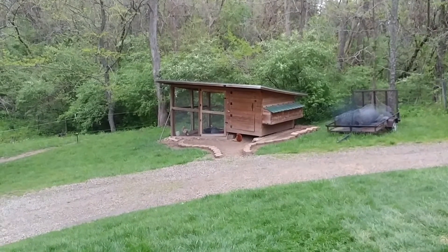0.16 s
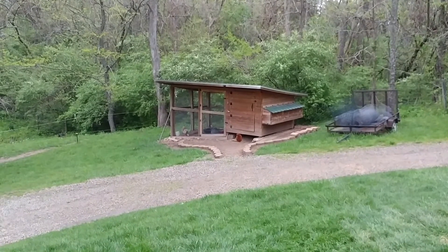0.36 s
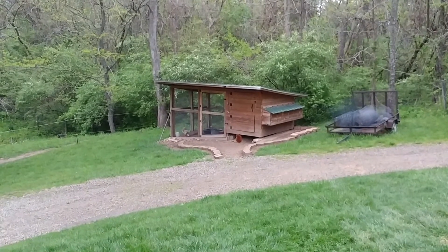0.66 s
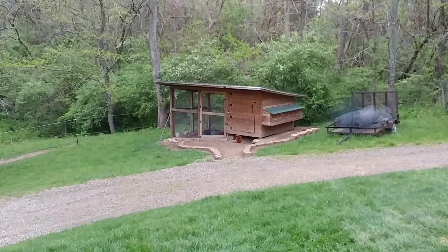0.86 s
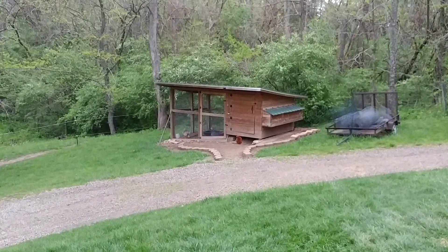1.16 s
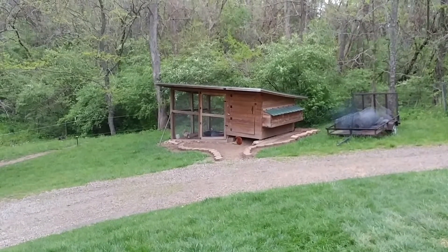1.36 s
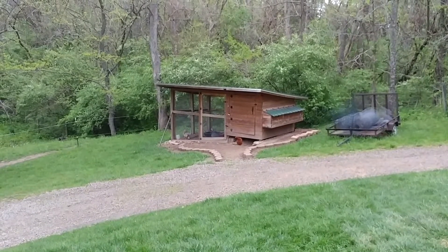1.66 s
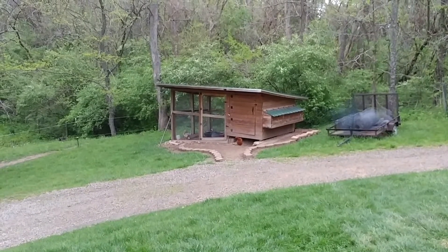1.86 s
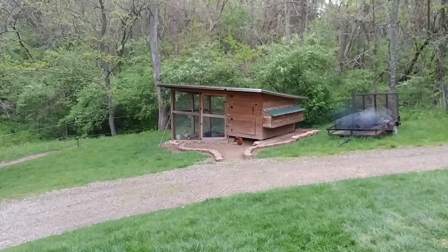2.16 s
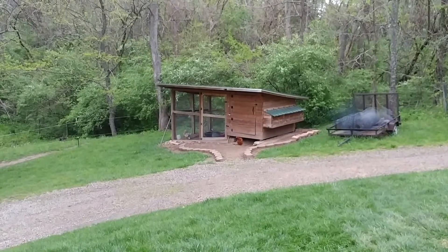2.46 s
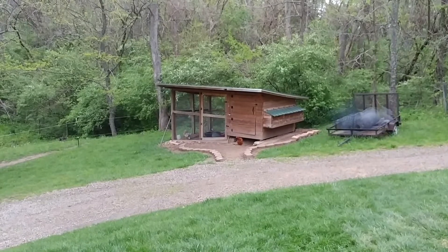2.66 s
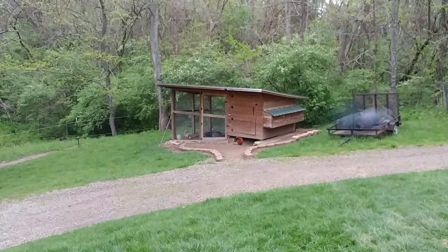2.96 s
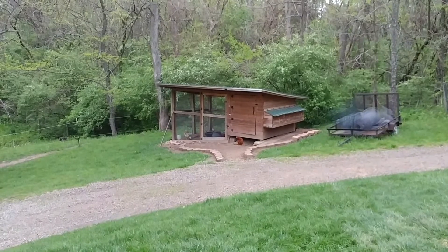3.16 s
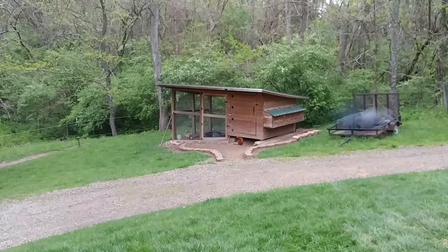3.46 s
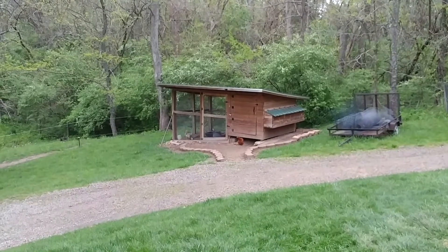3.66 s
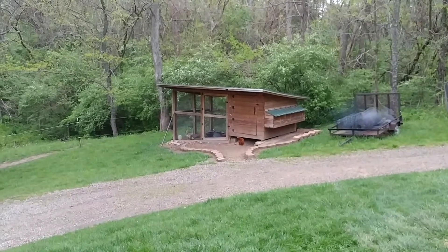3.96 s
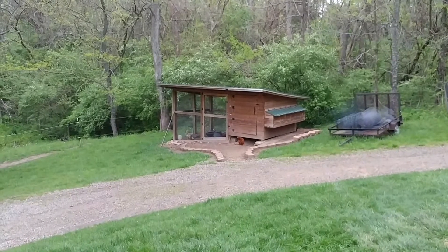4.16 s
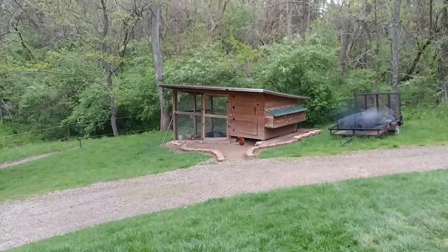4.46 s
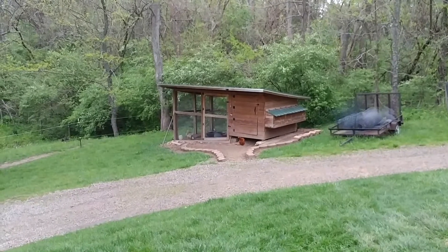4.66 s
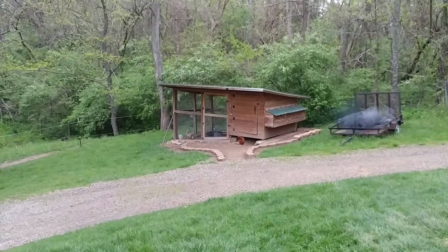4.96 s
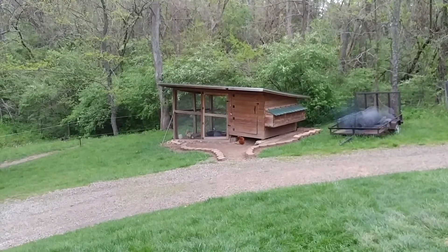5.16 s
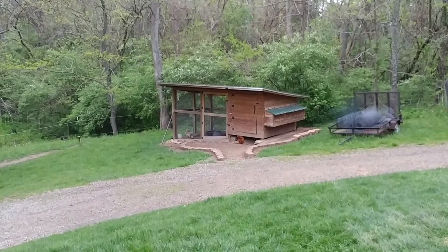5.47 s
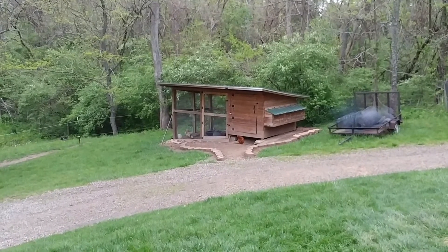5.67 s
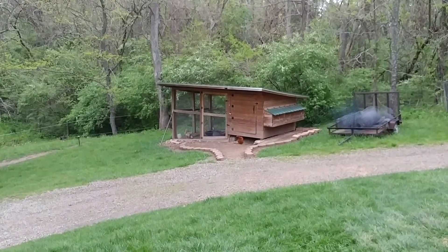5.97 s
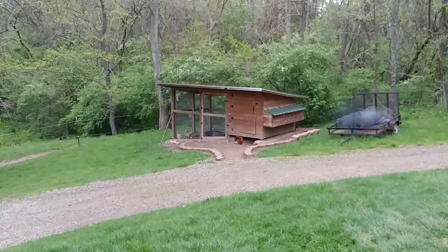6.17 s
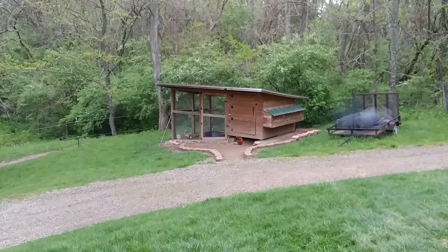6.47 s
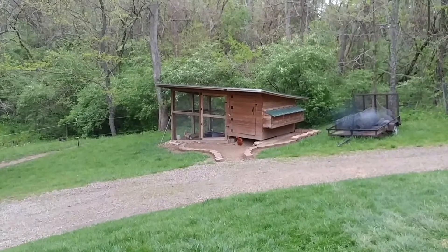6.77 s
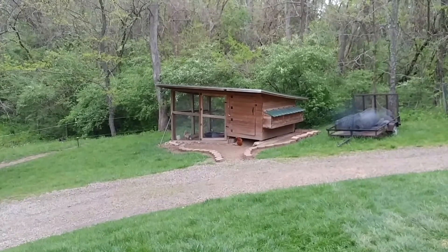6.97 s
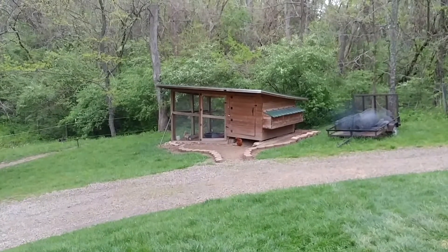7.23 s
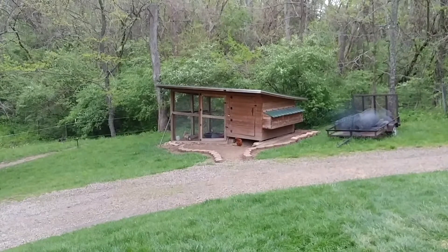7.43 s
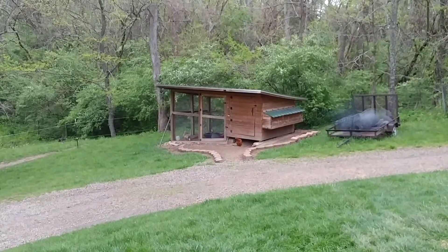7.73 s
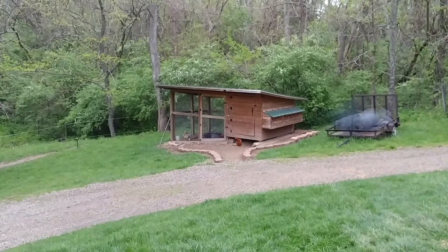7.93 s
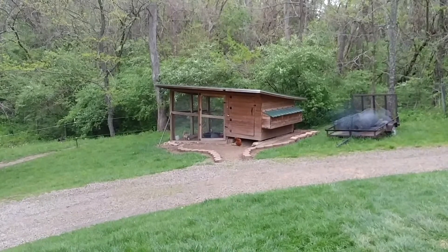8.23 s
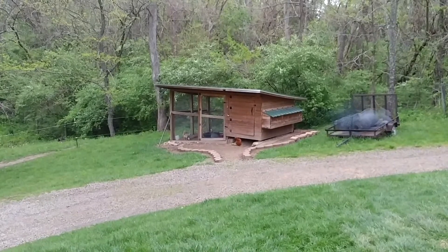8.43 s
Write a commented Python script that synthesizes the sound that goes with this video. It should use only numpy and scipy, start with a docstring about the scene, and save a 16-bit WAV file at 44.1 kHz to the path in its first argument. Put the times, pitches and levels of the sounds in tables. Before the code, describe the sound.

Steady guinea fowl calling across a lawn: low cluck, short whistle breaking into harsh rasp, over quiet rumble, leaf hiss and distant songbirds.

```python
"""Guinea hen in a wooden coop

A guinea hen calls across a lawn: a soft cluck, then a cry that opens as a whistle (sines) and breaks into
a rasp (throat-filtered pulses and noise). The wood answers with scattered echo (decaying noise convolution);
a second hen joins at the end. Songbirds whistle and buzz (gliding tones), small clicks sound nearby,
over low rumble and leaf hiss (shaped noise), a mains hum and a thin insect band."""
import sys
import numpy as np
from scipy import signal
from scipy.fft import rfft, irfft, next_fast_len
from scipy.io import wavfile
from scipy.ndimage import uniform_filter1d, map_coordinates

SR = 44100
rng = np.random.default_rng(int(sys.argv[2]) if len(sys.argv) > 2 else 0)


def to_wav(sig):
    """Store sig (one row per channel, or 1-D mono) as 16-bit WAV at the path in sys.argv[1].

    Samples outside -1..1 are clipped; the rate is SR.
    """
    pcm = np.clip(np.atleast_2d(sig), -1, 1) * 32767
    pcm = np.round(pcm).astype(np.int16)
    wavfile.write(sys.argv[1], SR, pcm.T)  # frames by channels


N = 379260


def amp(db):
    """dB to gain."""
    return 10 ** (np.asarray(db) / 20)


def unit(x):
    """Scaled to rms 1."""
    return x / np.sqrt(np.mean(x ** 2) + 1e-20)


def along(points, hz):
    """Interpolate (Hz, value) points on a log frequency axis."""
    f, v = np.transpose(points)
    return np.interp(np.log(hz + 1), np.log(f + 1), v)


def wobble(rate, size=N):
    """A smooth random curve, rate knots a second."""
    knots = rng.standard_normal(int(size * rate / SR) + 4)
    return map_coordinates(knots, [np.arange(size) * rate / SR])


def tone_phase(hz):
    """Phase [rad] of a tone whose frequency follows hz."""
    return 2 * np.pi * np.cumsum(hz) / SR


def filtered(x, response):
    """x times a complex response of frequency."""
    m = next_fast_len(x.shape[-1] + 8192)
    return irfft(rfft(x, m) * response(np.fft.rfftfreq(m, 1 / SR)), m)[..., :x.shape[-1]]


def causal(db):
    """The minimum-phase response with these levels, by folding the cepstrum."""
    c = irfft(np.log(amp(db) + 1e-6))
    c[1:len(c) // 2] *= 2
    c[len(c) // 2 + 1:] = 0
    return np.exp(rfft(c))


def mode(f, hz, width_hz):
    """One resonance, gain 1 at its centre."""
    return 1j * f * width_hz / (hz * hz - f * f + 1j * f * width_hz)


def add(track, s, x):
    """Mix x into track from time s."""
    part = track[max(round(s * SR), 0):][:len(x)]
    part += x[:len(part)]


def rush(spectrum, patchy_db):
    """Stereo noise of rms 1 with patches of random gain; the channels are alike in the bass only."""
    # left-right likeness: (frequency [Hz], correlation)
    alike = [(30, 1), (130, 0.93), (280, 0.71), (600, 0.45), (1300, 0.011)]
    z = signal.stft(rng.standard_normal((2, N)), nperseg=512)[2]
    field = uniform_filter1d(rng.standard_normal(z.shape[1:]), 6, 0)
    field = uniform_filter1d(field, 14, 1)
    pair = signal.istft(z * amp(patchy_db * unit(field)), nperseg=512)[1][:, :N]

    def mid_side_response(hz):
        turn = np.arccos(np.clip(along(alike, hz), -1, 1)) / 2
        return amp(along(spectrum, hz)) * [np.cos(turn), np.sin(turn)]

    mid, side = filtered(pair, mid_side_response)
    return unit(np.array([mid + side, mid - side]))


def outdoors():
    """Distant rumble, air in the leaves, a wavering mains hum and a thin insect band."""
    # leaf hiss spectrum: (frequency [Hz], relative density [dB per Hz])
    air_spectrum = [(88, -31), (150, -7), (370, -10.5), (1060, -17.5), (2000, -18.5), (5000, -26.5),
                    (9000, -27.5), (10500, -38), (14000, -31.5), (15700, -46)]
    # rumble spectrum: (frequency [Hz], relative density [dB per Hz])
    rumble_spectrum = [(16, -63.5), (28, -26.5), (49, -1.5), (70, 2.5), (124, -7), (156, -33), (200, -39),
                       (260, -62), (440, -120)]
    # background course: (time [s], rumble level [dB], air level [dB])
    course = [(0.0, -58, -64.5), (2.25, -56, -64), (7.69, -59.5, -62), (8.6, -62, -67)]
    t = np.arange(N) / SR
    s, rumble_db, air_db = np.transpose(course)
    hum = amp(-61 + 3.5 * wobble(6.2)) * np.sin(2 * np.pi * 120.5 * t + 1.5 * wobble(9))
    insects = filtered(rng.standard_normal((2, N)), lambda f: mode(f, hz=7780, width_hz=120))
    air = amp(np.interp(t, s, air_db)) * rush(air_spectrum, patchy_db=2.0)
    rumble = amp(np.interp(t, s, rumble_db)) * rush(rumble_spectrum, patchy_db=1.5)
    gusts = amp(1.3 * wobble(5))
    return gusts * (rumble + hum) + air + amp(-86) * unit(insects)


def syrinx(t, hz, rough):
    """Pulses of the voice: rough means uneven timing, uneven size and turbulent noise."""
    rough = np.clip(rough, 0, 1)
    cycles = np.cumsum(hz * (1 + .1 * rough * wobble(200, size=len(t)))) / SR
    pulses = np.diff(np.floor(cycles), prepend=0) * amp(3.4 * rough * rng.standard_normal(len(t)))
    breath = rng.standard_normal(len(t)) * (1 + 0.57 * np.cos(2 * np.pi * cycles))
    return np.sqrt(1 - rough) * unit(pulses) + np.sqrt(rough) * unit(breath)


def coop(f, spread):
    """Close boards delay (up to spread [s]) and colour each band, smearing pulses; redrawn per call."""
    knots = np.arange(0, SR / 2, 200)
    delay_s = np.interp(f, knots, spread * rng.random(len(knots)))
    colour_db = np.interp(f, knots, rng.normal(0, 3.5, len(knots)))
    return amp(colour_db) * np.exp(-2j * np.pi * np.cumsum(delay_s) * f[1])


def clucks():
    """A faint peep, then a few beak-shut pulses sinking in pitch; the swollen throat rings low a moment later."""
    # clucks: (time [s], peep [dB], voice [dB], low ring over the voice [dB])
    cluck_rows = [(0.3083, -63, -56, -1), (0.9157, -59, -33, -9), (1.5165, -62, -55, -4),
                  (2.139, -56.5, -31, -8), (2.702, -50.5, -22, -9.5), (3.3183, -49, -28.5, -7),
                  (3.9458, -44, -21.5, -13), (4.5378, -45.5, -25.5, -8), (5.1379, -51, -31, -7),
                  (5.8206, -49.5, -26.5, -6), (6.42, -56.5, -41.5, -8.5), (7.0502, -49, -37, -11),
                  (7.667, -50, -38.5, -10), (8.3784, -57.5, -49, -9)]
    # closed-beak resonances: (centre [Hz], width [Hz], gain [dB])
    closed_beak = [(1180, 430, -6), (1724, 290, -6.5), (2150, 400, -16)]
    out, t = np.zeros(N), np.arange(SR // 10) / SR
    peep_hz = np.interp(t, [0, .02, .045], [1190, 1270, 1200])
    peep_swell = amp(np.interp(t, [0, .018, .043], [-16, 0, -18], right=-150))
    peep = peep_swell * np.sin(tone_phase(peep_hz))
    for s, peep_db, voice_db, low_db in cluck_rows:
        voice = syrinx(t, np.interp(t, [0, .015], [300, 281]), rough=0.3)
        upper = amp(np.interp(t, [0, .012, .024, .04], [-4.5, -3.5, -3.5, -49])) * voice
        lower = amp(np.interp(t, [.004, .016, .03, .05], [1, 6.5, 1, -31])) * voice
        sound = filtered(upper, lambda f: sum(amp(g) * mode(f, c, w) ** 2 for c, w, g in closed_beak))
        sound += amp(low_db) * filtered(lower, lambda f: mode(f, hz=845, width_hz=200) ** 2)
        add(out, s - .013, amp(peep_db) * peep)
        add(out, s - .01, amp(voice_db) * filtered(sound, lambda f: coop(f, spread=0.0049)))
    return out


def wood(x, gap):
    """Trunks scatter sound back after gap [s]; each frequency dies at its own speed, paths renew every 0.3 s."""
    # echo decay: (frequency [Hz], t60 [s])
    decay = [(500, 0.4), (1900, 0.39), (4000, 0.34), (6000, 0.33), (12000, 0.15)]
    out, hop = np.zeros((2, N + SR)), SR * 3 // 10
    for start in range(0, N, hop):
        hz, t, z = signal.stft(rng.standard_normal((2, SR * 6 // 10)), SR, nperseg=256)
        tail = signal.istft(z * amp(-60 * t / along(decay, hz)[:, None]), SR, nperseg=256)[1]
        wet = signal.fftconvolve(x[None, start:start + hop], tail / np.linalg.norm(tail[0]), axes=1)
        out[:, start:start + wet.shape[1]] += wet
    return np.pad(out, ((0, 0), (round(gap * SR), 0)))[:, :N]


def cries():
    """A faint rising lead-in, a loud whistle, then the membranes lose step and rasp."""
    # cries: (time [s], whistle [Hz], whistle [dB], whistle length [s], rasp [dB], rasp length [s],
    # beak resonance [Hz], clear partial over the rasp [dB])
    cry_rows = [(0.46, 1367, -34, 0.015, -27, 0.064, 1895, 0),
                (1.065, 1402, -31.5, 0.023, -28, 0.065, 1964, -9.5),
                (1.682, 1384, -27.5, 0.019, -26.5, 0.075, 1894, -9.5),
                (2.262, 1370, -29.5, 0.037, -27, 0.073, 1824, -8),
                (2.849, 1356, -34.5, 0.046, -27, 0.066, 1772, -6.5),
                (3.467, 1370, -28, 0.04, -28.5, 0.082, 1760, -8.5),
                (4.098, 1374, -30, 0.018, -29.5, 0.072, 1806, -5),
                (4.681, 1376, -33, 0.046, -27, 0.074, 1878, -1),
                (5.296, 1392, -31.5, 0.018, -27.5, 0.06, 1828, -5.5),
                (5.989, 1344, -32, 0.024, -28.5, 0.074, 1793, -9),
                (6.578, 1380, -23, 0.039, -27, 0.081, 1800, -3.5),
                (7.199, 1343, -24, 0.024, -30, 0.12, 1763, -2.5),
                (7.814, 1380, -24, 0.013, -26.5, 0.074, 1781, -2.5)]
    # whistle partials: (multiple of pitch, relative level [dB]); thirds: every third cycle grows stronger
    partials = [(2 / 3, -26), (1, 0), (4 / 3, -14), (5 / 3, -13), (2, -5), (7 / 3, -21), (8 / 3, -12),
                (3, -11), (10 / 3, -21)]
    # throat spectrum: (frequency [Hz], relative density [dB per Hz])
    throat_spectrum = [(320, -27.5), (640, -32), (920, -14), (1240, -11.5), (1560, -9.5), (1900, -4.5),
                       (2350, -3.5), (2750, -7.5), (3450, -12), (3920, -6.5), (4600, -12), (5000, -30),
                       (5900, -29), (7200, -35), (10300, -57)]
    # air through the nostrils: (start [Hz], half width [Hz], level under the rasp [dB])
    hiss_bands = [(9005, 980, -20.5), (12630, 880, -26)]
    lead_in_s, lead_in_db = .036, -59
    open_s, close_s = 0.0101, .009  # whistle opens and closes
    usual_whistle_db = -36  # louder whistles are purer and hold the rasp back
    fade_db_per_s = 62.5  # overtones outlast the whistle
    out, t = np.zeros(N), np.arange(SR // 4) / SR - lead_in_s
    size = len(t)

    def drift():
        """Each overtone's own slow pitch drift."""
        return 1 + np.cumsum(.008 * wobble(80.9, size)) / np.arange(1, size + 1)

    for s, whistle_hz, whistle_db, held, rasp_db, length, beak_hz, clear_db in cry_rows:
        push_db = whistle_db - usual_whistle_db
        # a weaker clear partial means rougher, and rougher means brighter
        rough = .19 - 0.061 * clear_db
        bright_db = -2.5 + 5.5 * rough

        scoop = np.interp(t, [-lead_in_s, -open_s, 0], [.9, 1.02, 1])  # pitch ratio
        phase = tone_phase(whistle_hz * scoop * (1 + 0.0048 * wobble(60, size)))
        swell_db = np.interp(
            t, [-lead_in_s, -lead_in_s * 2 / 3, -open_s / 2, open_s / 2, held, held + close_s],
            [lead_in_db - 20, lead_in_db - 3, lead_in_db + 6, whistle_db, whistle_db, whistle_db - 30],
            right=-150)
        split_db = np.interp(t, [-.008, .004, .015, length, length + .03],
                             [-30, -4, 0, -fade_db_per_s * length, -50], left=-150, right=-150)
        thirds = sum(amp(db + 3 * wobble(50, size)) * np.sin(k * phase * drift() + k * k)
                     for k, db in partials if k % 1)
        octaves = sum(amp(db) * np.sin(k * phase) for k, db in partials if k in (2, 3))
        octaves *= amp(np.maximum(swell_db - whistle_db + 3, -6))  # sink when the whistle ends
        overtones = amp(usual_whistle_db + .3 * push_db + split_db) * (thirds + octaves)
        add(out, s - lead_in_s, amp(swell_db) * np.sin(phase) + overtones)

        def throat_and_coop(f):
            throat = causal(along(throat_spectrum, f) + bright_db * (f > 3000))
            beak = 1 + 1.1 * mode(f, beak_hz, width_hz=200)
            notch = 1 - .7 * mode(f, beak_hz, width_hz=70)
            return throat * beak * notch * coop(f, spread=.011)

        # the beak picks the sixth multiple of the pulse rate
        rasp = unit(filtered(syrinx(t, beak_hz / 6, rough), throat_and_coop))
        # as the whistle ends, one clear partial locks onto the beak resonance, replacing the pulses there
        locked = np.interp(t, [held - .005, held + 0.0033], [0, 1])
        locked = locked * amp(clear_db + 1.5 + 5 * rough * wobble(64, size))
        ring = locked * np.sin(tone_phase(beak_hz * (1 + .12 * rough ** 3 * wobble(120, size))))
        # a second clear partial climbs in the upper throat resonance
        climb_hz = (3712 + 4100 * t) * (1 + .025 * wobble(150, size))
        upper = amp(-11 + 4.5 * wobble(70, size)) * np.sin(tone_phase(climb_hz))
        # the hiss bands sink as the neck stretches
        sink = np.cumsum(1 - 0.65 * t) / SR
        hiss = sum(amp(db + bright_db) * wobble(width_hz * 2, size) * np.sin(2 * np.pi * start_hz * sink)
                   for start_hz, width_hz, db in hiss_bands)

        first_db = rasp_db - 0.22 * push_db
        late = .0004 * push_db  # [s] later after a loud whistle
        full_s = late + .019 + 0.24 * held  # waits for a share of the whistle
        effort_db = np.interp(t, [late - .002, late + .006, full_s, length],
                              [-60, first_db - 10.5, first_db, rasp_db], left=-150)
        effort_db = effort_db - 450 * np.maximum(t - length, 0)  # fall, dB/s
        effort = amp(effort_db + 0.65 * wobble(61.8, size))
        add(out, s - lead_in_s, effort * (rasp + ring + upper + hiss))
    return out


def ticks():
    """Dry clicks nearby: decaying sines of a few cycles."""
    # clicks: (time [s], level [dB], frequency [Hz])
    tick_rows = [(.866, -52, 2700), (1.475, -50, 3080), (2.146, -47, 4000), (2.161, -45, 9100)]
    out, t = np.zeros(N), np.arange(200) / SR
    for s, db, hz in tick_rows:
        add(out, s, amp(db) * np.exp(-t * hz / 1.8) * np.sin(2 * np.pi * hz * t))
    return out


def songbirds():
    """Gliding whistles, beaded notes with growing overtones, and wheezy noise-modulated buzzes."""
    # falling buzzy notes: (time [s], level [dB])
    buzzes = [(3.161, -64), (3.799, -63.5), (4.38, -61), (4.974, -63)]
    # one high buzzy note: (time [s], length [s], start [Hz], end [Hz], level [dB])
    chatter = (5.667, .36, 8300, 8900, -69)
    # whistles: (start [s], end [s], start [Hz], end [Hz], level [dB])
    whistles = [(7.6, 7.74, 5020, 4920, -60), (5.16, 5.31, 6060, 6100, -69), (5.8, 6.03, 6000, 5980, -75),
                (4.38, 4.57, 9100, 7400, -78), (7.98, 8.12, 8500, 7200, -75)]
    # beaded notes, breaking downward before the end: (start [s], end [s], start [Hz], end [Hz], level [dB])
    beaded = [(6.48, 6.69, 4810, 4480, -53), (6.895, 7.115, 4900, 4420, -51)]
    out = np.zeros(N)
    for s, length, hz0, hz1, db in [(s, .19, 6050, 3970, db) for s, db in buzzes] + [chatter]:
        u = np.linspace(0, 1, round(length * SR))
        phase = tone_phase(hz0 + (hz1 - hz0) * u)
        swell = amp(db + 1.7 * wobble(60, size=len(u))) * np.sin(np.pi * u) ** 0.43
        add(out, s, swell * wobble(1500, size=len(u)) * np.sin(phase))

    for s, end, hz0, hz1, db in whistles:
        u = np.linspace(0, 1, round((end - s) * SR))
        shake = 1 + (.002 + .006 * u ** 2) * wobble(150, size=len(u))
        phase = tone_phase((hz0 + (hz1 - hz0) * u) * shake)
        swell = np.sin(np.pi * u) ** .6
        add(out, s, amp(db + 3 * wobble(30, size=len(u))) * swell * np.sin(phase))

    beads_per_s, break_at = 17, .71  # break as a share of the note
    octave_db, twelfth_db = 9, -14  # overtones at the note's end
    for s, end, hz0, hz1, db in beaded:
        u = np.linspace(0, 1, round((end - s) * SR))
        fallen = np.interp(u, [0, break_at, break_at + .03, 1], [0, .44, .78, 1])
        shake = 1 + .02 * u ** 4 * wobble(150, size=len(u))
        phase = tone_phase((hz0 + (hz1 - hz0) * fallen) * shake)
        beads = np.abs(np.sin(np.pi * beads_per_s * u * (end - s)))
        overtones = amp(octave_db) * np.sin(2 * phase) + amp(twelfth_db) * np.sin(3 * phase)
        overtones *= u ** 1.5 * amp(2.5 * wobble(40, size=len(u)))
        swell = np.sin(np.pi * u) ** .3
        add(out, s, amp(db) * swell * (beads ** 1.5 * np.sin(phase) + overtones))
    return out


def second_hen():
    """Another hen starts a cry: a falling tone whose alternate cycles soon differ, adding lines halfway."""
    # course of the tone: (time [s], frequency [Hz], level [dB])
    fall = [(8.572, 2451, -67), (8.585, 2270, -31.5), (8.588, 1890, -35), (8.593, 1772, -30.5),
            (8.6, 1752, -19.5)]
    t = np.arange(N) / SR
    s, hz, db = np.transpose(fall)
    phase = tone_phase(np.interp(t, s, hz))
    halves = sum(amp(-20) * np.sin(k * phase / 2) for k in (1, 3, 5))
    halves = np.interp(t, s[1:4], [0, .3, 1]) * halves
    swell = amp(np.interp(t, s, db, left=-150))
    return swell * (np.sin(phase) + amp(-17) * np.sin(2 * phase) + halves)


def scene():
    """The hen ahead, the songbirds and the second hen to the right, all in the echo of the wood."""
    # hen's level difference: (frequency [Hz], left minus right [dB])
    lean = [(600, -0.5), (1230, 4.5), (2240, -1.5), (4100, -5.5), (7500, -6), (13700, -10.5)]
    # hen's phase difference: (frequency [Hz], left leads by [rad])
    lead = [(1000, 0.85), (2150, -1.26), (5000, 0.5), (6800, 2), (12000, 1.2)]

    def ports(f):
        return np.array([amp(k * along(lean, f)) * np.exp(1j * k * along(lead, f)) for k in (.5, -.5)])

    background = outdoors()
    hen = clucks() + cries()
    birds = songbirds() + second_hen()
    near = filtered(hen, ports) + birds * amp([[-3], [3]]) + ticks()
    echo = wood(amp(-8) * hen + amp(-8) * birds, gap=0.016)
    return near + echo + background


def record(dry):
    """Keeps nothing above the band limit, 15720 Hz."""
    return filtered(dry, lambda hz: hz < 15720)


dry = scene()
out = record(dry)
to_wav(out)
```